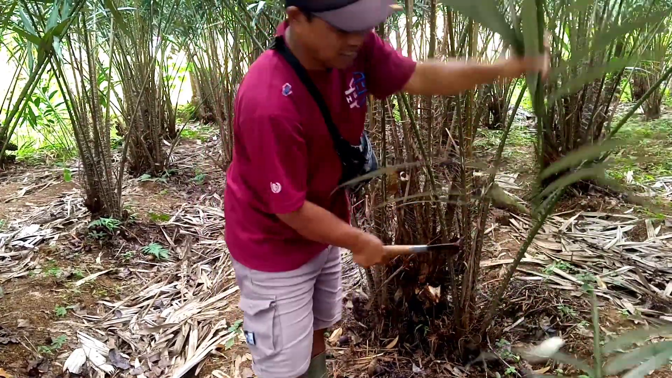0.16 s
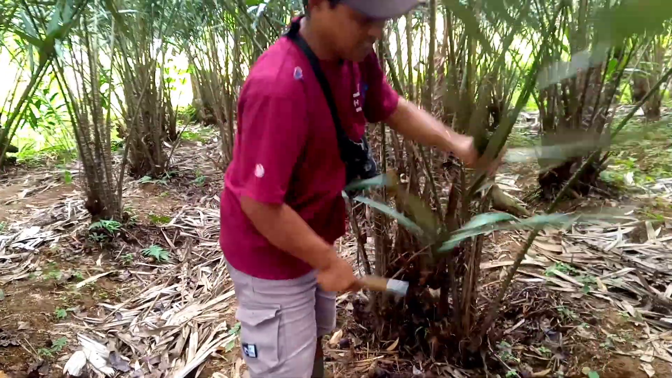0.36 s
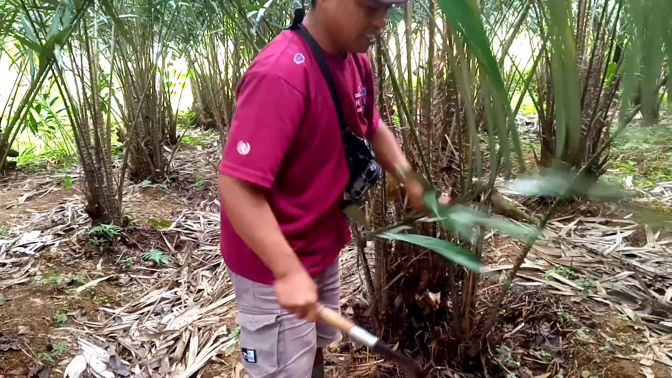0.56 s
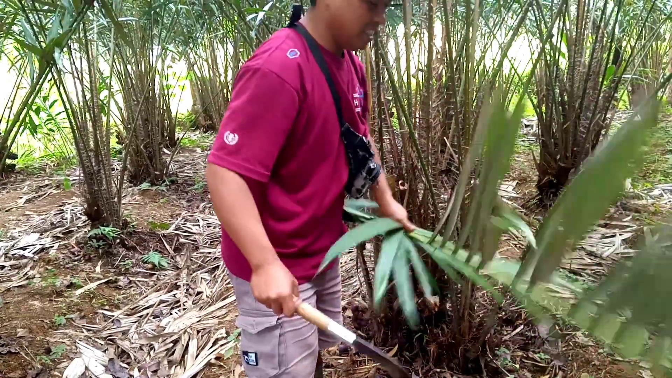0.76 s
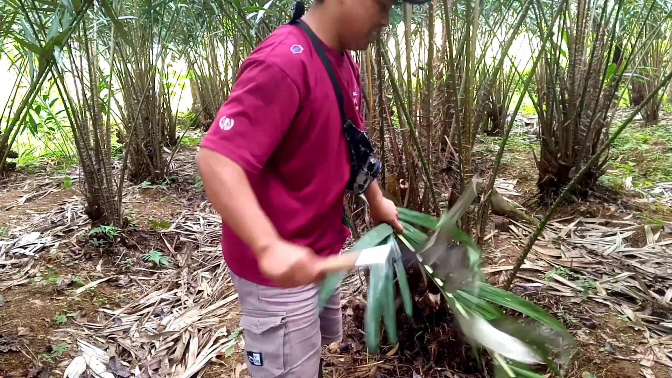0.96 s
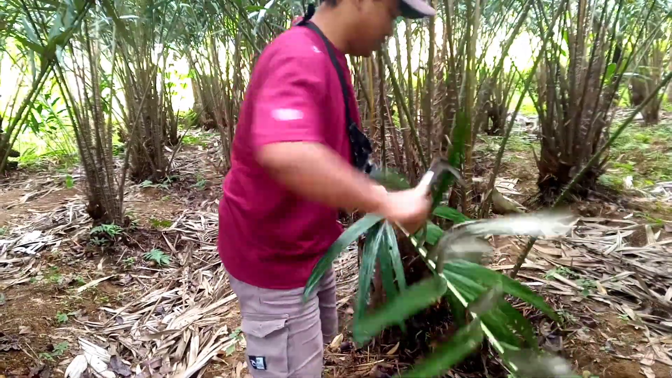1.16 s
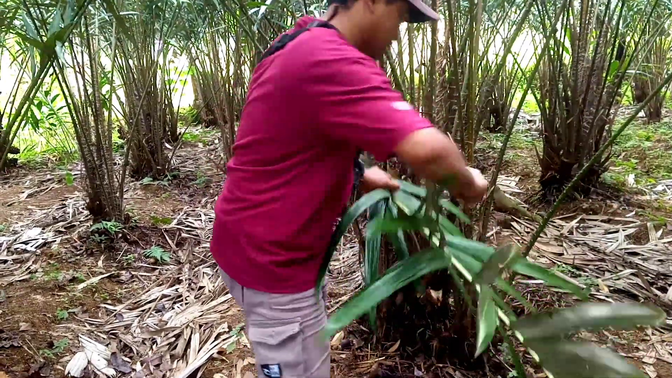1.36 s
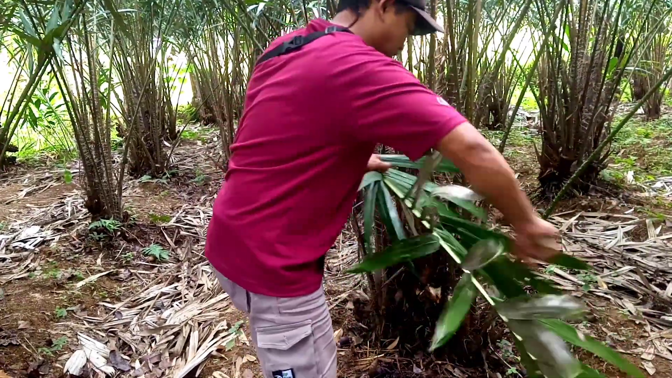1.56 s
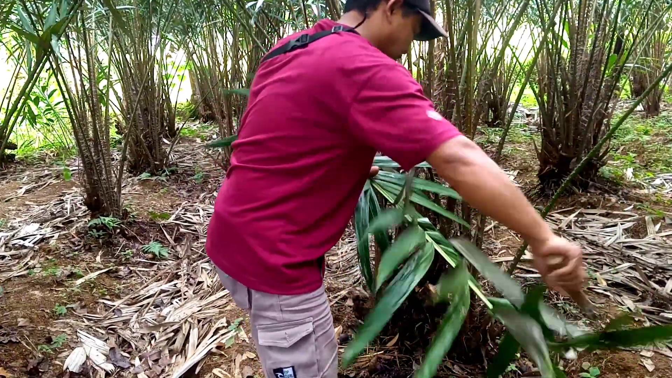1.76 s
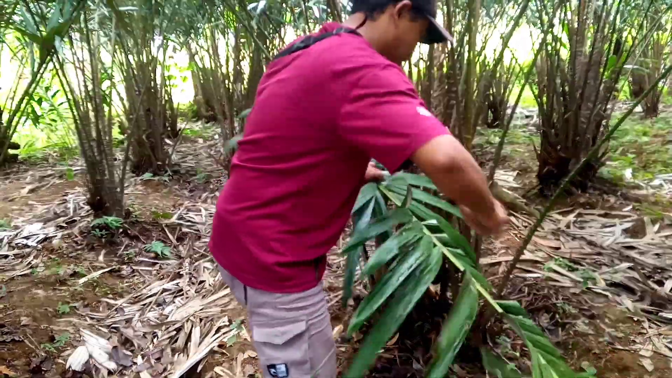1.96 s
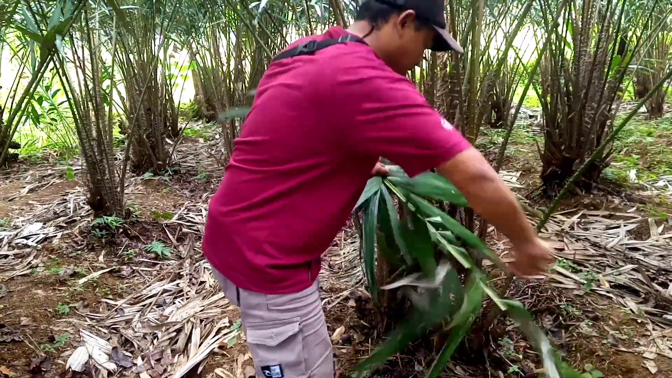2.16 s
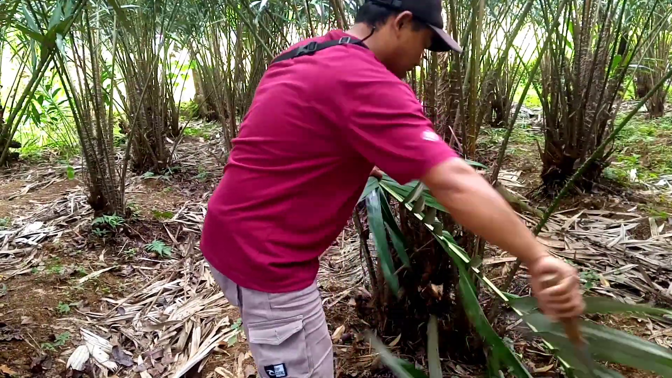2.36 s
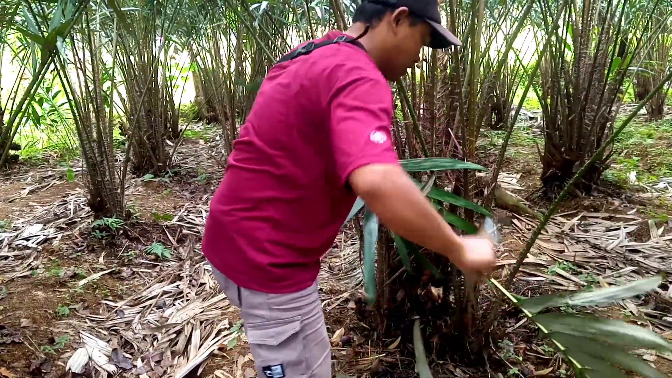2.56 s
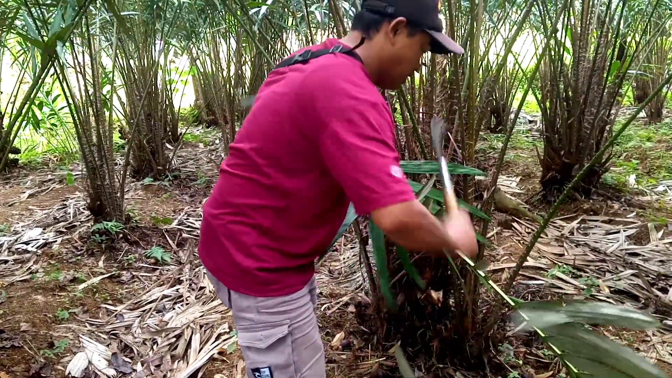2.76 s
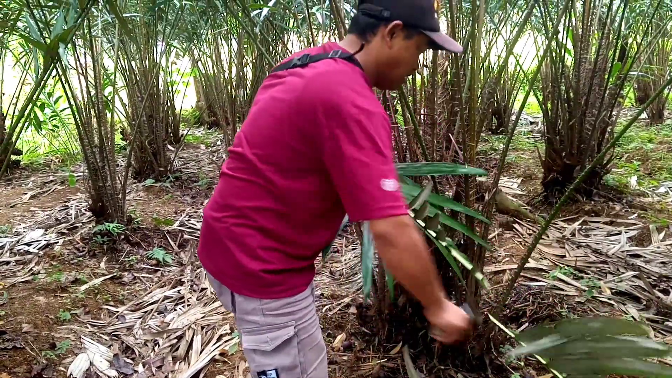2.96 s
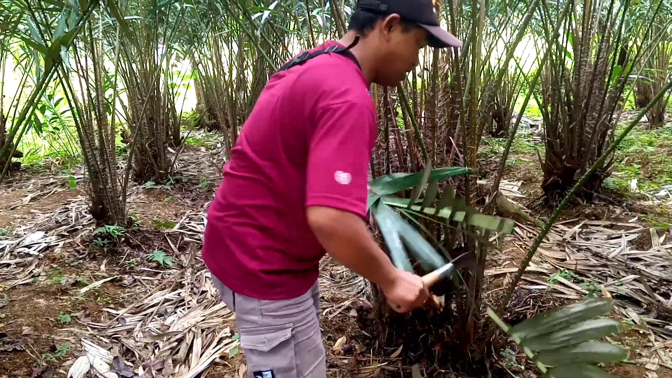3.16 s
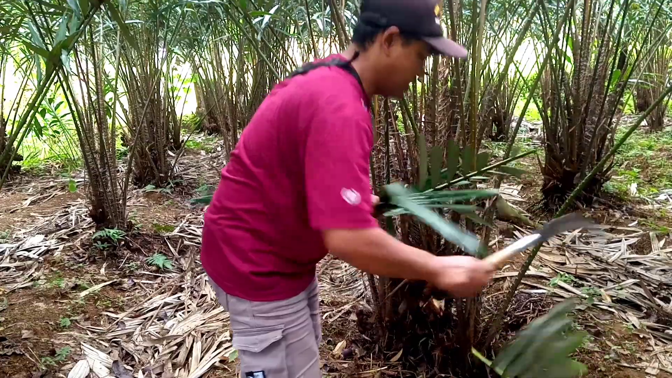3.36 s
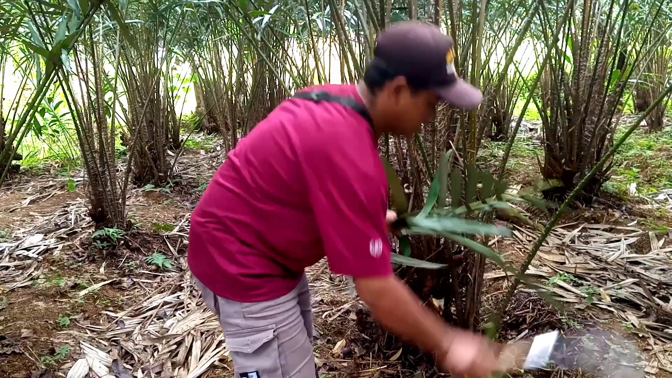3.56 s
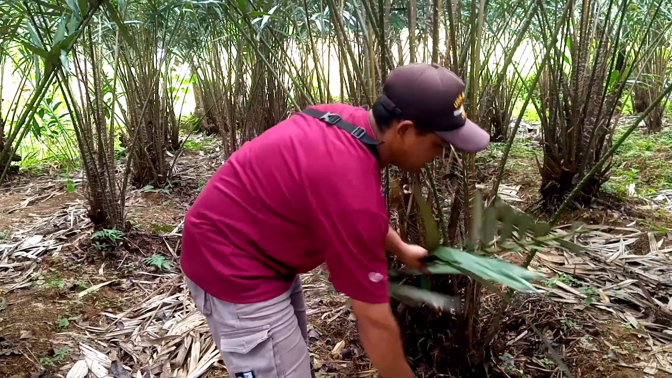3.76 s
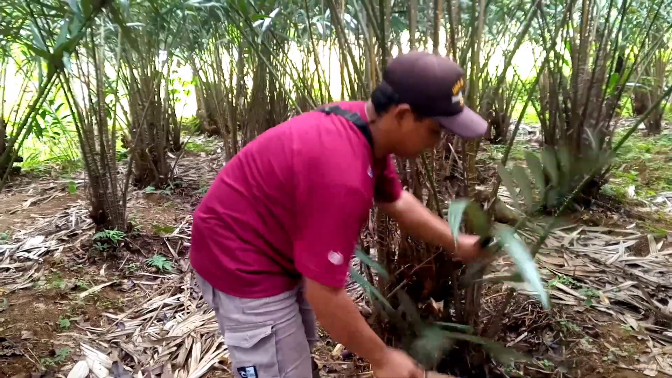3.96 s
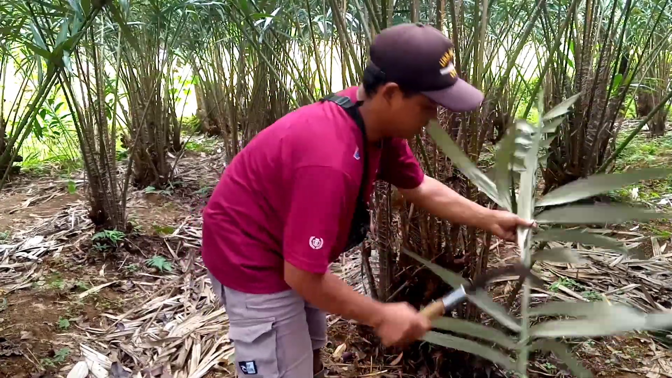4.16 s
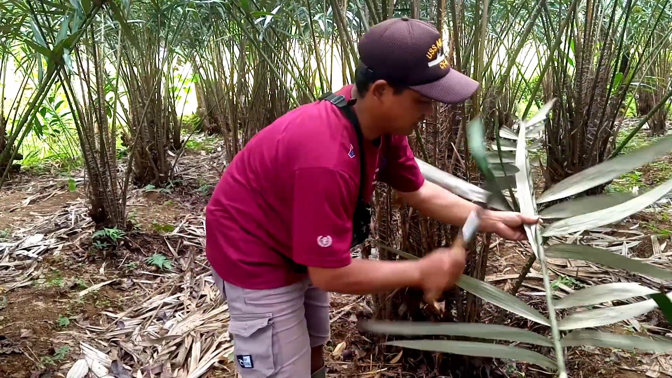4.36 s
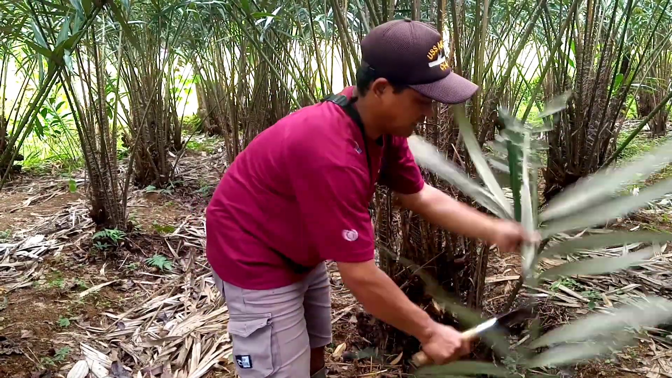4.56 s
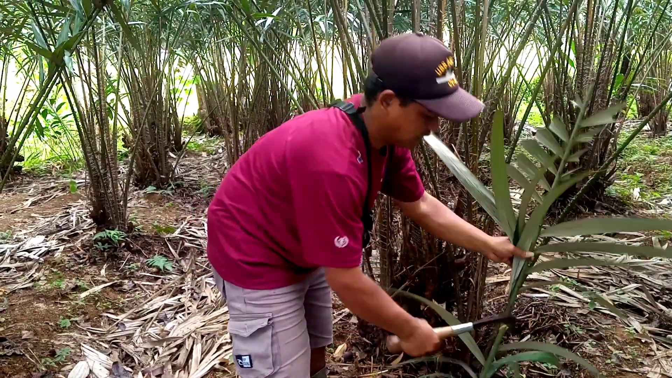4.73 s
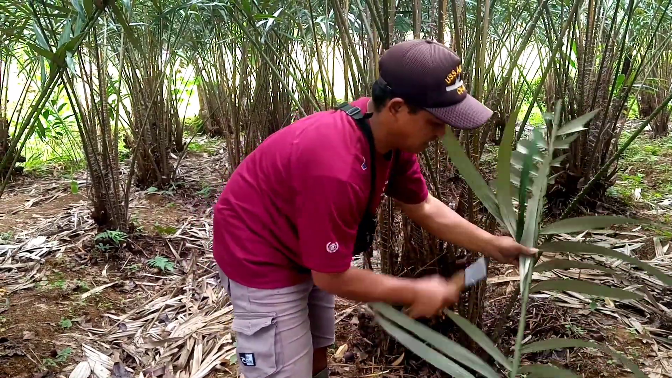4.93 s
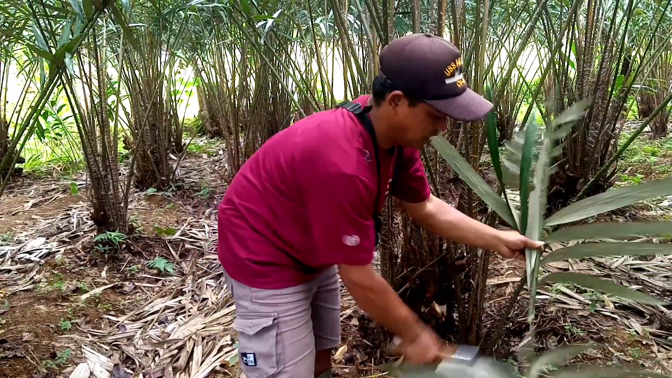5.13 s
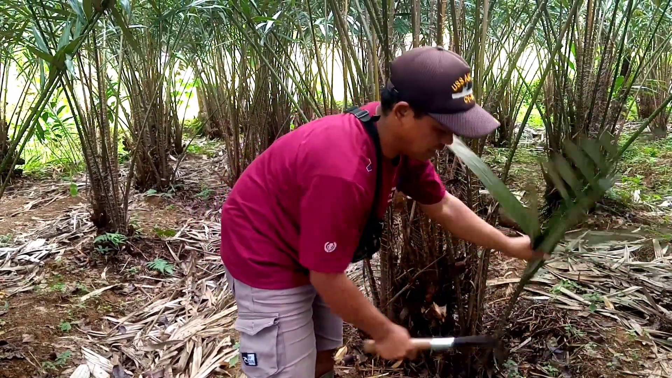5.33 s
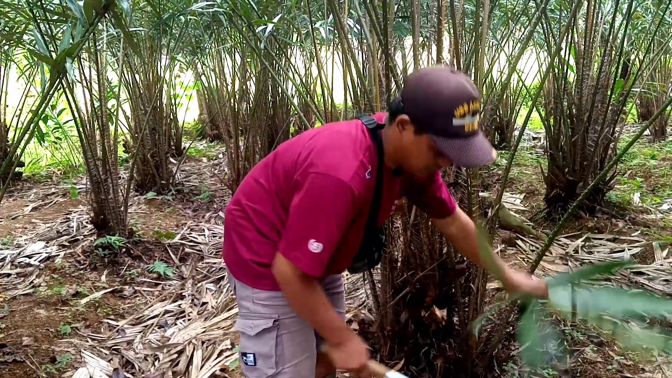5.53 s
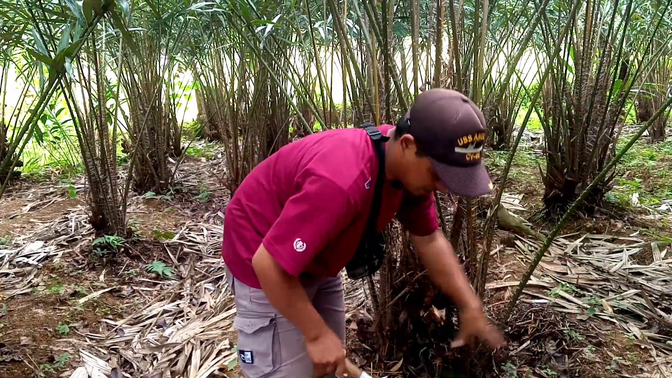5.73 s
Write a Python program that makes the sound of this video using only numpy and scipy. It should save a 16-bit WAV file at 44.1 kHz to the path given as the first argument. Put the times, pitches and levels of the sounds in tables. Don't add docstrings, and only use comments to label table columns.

```python
import sys
import numpy as np
from scipy import signal
from scipy.fft import rfft, irfft
from scipy.io import wavfile

SR = 44100
rng = np.random.default_rng(int(sys.argv[2]) if len(sys.argv) > 2 else 0)


def field_ratio(decibels):
    return 10 ** (np.asarray(decibels, dtype=float) / 20)


def generate_wav(sig):
    pcm = np.round(np.clip(np.atleast_2d(sig).T, -1, 1) * 32767).astype(np.int16)
    wavfile.write(sys.argv[1], SR, pcm)


N = 255339

# f/Hz, density/dB
FROND_COLOUR = [(200, -6.5), (400, -11.5), (650, -5.5), (1400, -5.5), (2800, -4), (4000, -4), (4700, -10.5),
                (5900, -8.5), (6700, -4.5), (7500, 0.5), (8500, -7.5), (10400, -16.5), (13000, -18.5),
                (15300, -12.5)]
BAND_EDGES_HZ = [200, 1200, 2500, 5000, 40000]
# peak t/s, 20 dB swell/s, 20 dB fade/s, rms level/dB, dryness/dB
DRAGS = [(.17, 1.1, .22, -41, 1.5), (.365, .17, .5, -36, 4), (.52, .3, .5, -30.5, .6),
         (.79, .2, .3, -38, -5), (.95, .4, .25, -31.5, 2), (1.07, .2, .12, -32, 4),
         (1.47, 1.2, .25, -40.5, 1.5), (1.93, .8, .8, -52, 1.5), (2.06, .15, .4, -43, -3),
         (2.26, .4, .35, -37.5, 1.1), (2.66, .9, .8, -50, -1), (3.0, .4, .8, -45, 3),
         (3.36, .9, .5, -46, 2), (3.64, .08, .3, -31, 3), (3.8, .25, .2, -32, -3), (3.91, .15, .17, -36, 3),
         (4.2, .3, .6, -59, -1), (4.56, .1, .3, -48, 6), (4.68, .3, .3, -48, -1),
         (5.072, .07, .04, -52, -12), (5.14, .1, .1, -54, -12), (5.275, .04, .2, -44, -1),
         (5.55, 1.1, .6, -57, 1), (5.79, .2, .2, -35, -1)]
DRAG_BANDS_DB = [-1.5, -.4, .4, .3]
DRYNESS_SHARE = [-.9, -.3, .3, .9]
# f/Hz, density/dB
MOTOR_COLOUR = [(18, -42), (30, -7), (48, -18), (112, 0), (141, -3), (167, -11.5), (206, -16), (260, -7.5),
                (340, -74), (570, -120)]
# t/s, level/dB
MOTOR_LOAD = [(0, -50), (.6, -48), (1.1, -53), (1.45, -48), (1.65, -59), (1.9, -53), (2.7, -55), (3.0, -52),
              (3.4, -53), (3.65, -47), (4.3, -51), (4.85, -55), (5.79, -51)]
# f/Hz, density/dB
AIR_COLOUR = [(200, 0.5), (330, 4.5), (700, -12), (2500, -16), (5000, -23), (9000, -20), (15400, -21)]
# t/s, peak level/dB, body rel/dB, hiss rel/dB, t60/s
CHOPS = [
    (.7272, -27.5, 9, -10, .057),
    (3.7346, -15, -6, -1, .06),
    (3.8449, -16.5, -30, -12, .026),
    (4.5147, -6, -8.5, -3.5, .051),
    (4.7473, -19, -14, -6, .05),
    (5.0895, -3.5, -26, -.4, .032),
]
# t/s, peak level/dB, hiss rel/dB, t60/s
RIBS = [(.171, -25, -11, .076), (.3466, -21, 1.5, .076), (.5357, -21, -12, .031), (.6512, -20.5, 4.5, .039),
        (.6824, -29, 8, .02), (.7198, -12.5, 2.5, .043), (.825, -13.5, -3.5, .047), (1.278, -25, -11, .044),
        (1.4077, -26, 2.1, .044), (1.5492, -10.5, 4, .04), (1.6084, -18.5, 12, .027),
        (1.6854, -33, 1.1, .05), (1.7311, -26.5, -12, .068), (1.9834, -34.5, -7, .056),
        (2.2837, -27, -11, .05), (2.6354, -35.5, .1, .065), (2.732, -38, -2, .05), (2.9857, -28.5, 7, .039),
        (3.1018, -37, -13, .039), (3.4544, -30.5, 5, .032), (3.9444, -34, 12, .05),
        (4.0764, -35.5, 4.5, .073), (4.4373, -42, -12, .05), (4.6973, -30.5, 4, .036),
        (4.9319, -39, 11, .02), (5.446, -32, -5, .05)]
# t/s, peak level/dB, hiss rel/dB, t60/s
SPINES = [(.267, -26.5, 2.1, .05), (.4285, -20, .1, .037), (1.76, -33, 2.1, .15), (1.919, -38.5, 4.5, .14),
          (2.0707, -36, 7, .045), (2.3835, -23, 2.5, .026), (2.969, -33, 4, .076), (3.046, -22, .1, .05),
          (3.5923, -25, 6, .04), (3.646, -19, 11, .021), (4.335, -40, 5, .064), (4.35, -34.5, 11.5, .035),
          (4.4016, -34.5, 4, .091), (4.8599, -32, -1, .059), (4.974, -40, -1, .05),
          (5.026, -39.5, 1.5, .05), (5.2234, -37, 11, .019), (5.2804, -22, 3.5, .041),
          (5.3953, -24, 3, .07), (5.608, -31.5, -1, .1), (5.6213, -29.5, 3.5, .084),
          (5.669, -23.5, .1, .073), (5.7824, -18, .1, .065)]
# t/s, peak level/dB, t60/s
FIBRES = [(.2712, -25, .061), (.6048, -16.5, .064), (1.33, -29, .055), (1.354, -22, .064),
          (2.6813, -43, .066), (3.0752, -23.5, .042), (3.1318, -29, .045), (3.1798, -27, .093),
          (3.3054, -34, .065), (3.5112, -32, .11), (3.5443, -29, .063), (3.6673, -16, .057),
          (3.7082, -17, .05), (3.8846, -20, .039), (4.0059, -19, .052), (4.366, -34, .11),
          (4.826, -48, .046), (5.193, -31, .041), (5.254, -27, .046), (5.286, -21, .028),
          (5.6433, -21.5, .044)]
# t/s, f/Hz, peak level/dB, t60/s
KNOCKS = [(0.54, 1700, -7.5, 0.014), (0.722, 1360, -19, .03), (.729, 835, -25, .04),
          (1.075, 3500, -16, 0.045), (1.356, 2870, -22, .015), (2.811, 2400, -28, 0.026),
          (2.834, 762, -18.5, 0.1), (2.833, 1227, -9.5, 0.067), (2.971, 1820, -26, 0.043),
          (3.015, 1100, -18.5, 0.023), (3.456, 2270, -19.5, 0.031), (4.177, 1430, -36, 0.036),
          (4.516, 1780, -12, .03), (4.517, 930, -16, 0.046), (4.748, 1100, -29, .03),
          (4.828, 750, -39, .03), (5.089, 920, -13, 0.08), (5.09, 1300, -12, .05),
          (5.0894, 640, -11, 0.086), (5.092, 2750, -13, 0.032), (.268, 7300, -18, .008),
          (.2725, 3300, -15, .01), (.347, 3300, -14, .012), (4.76, 600, -33, .08), (4.01, 700, -30, .08)]
# t/s, build-up/s, hold/s, rms level/dB, hiss rel/dB
TEARS = [(.465, .017, .069, -26.5, -2.5), (.714, .006, .01, -35, -9), (.829, .005, .031, -27, -3),
         (.856, .0073, .033, -23.5, -5.5), (.94, .0058, .03, -25, -4), (1.016, .013, .068, -28.5, .1),
         (1.104, .0038, .0083, -25, -6), (1.154, .0043, .02, -33, 1.5), (1.188, .0034, .037, -29, -2),
         (1.496, .0026, .059, -16, .6), (1.569, .0068, .018, -10.5, -5.5), (2.096, .022, .025, -18.5, 5.5),
         (2.156, .0078, .0039, -16.5, 2.5), (2.198, .0059, .022, -30, 4), (2.442, .0027, .029, -33.5, 4),
         (2.468, .0073, .011, -33.5, 10.5), (2.49, .0027, .016, -41, 11), (2.823, .007, .0082, -12.5, 1.1),
         (3.612, .0096, .052, -20.5, -1.5), (3.809, .0044, .06, -29.5, -2), (5.273, .0037, .065, -33, -1.5),
         (5.344, .011, .027, -33, -.6), (5.668, .0018, .018, -36.5, 5), (5.689, .0033, .052, -26, -3)]
# t/s, length/s, from f/Hz, to f/Hz, level/dB
BIRD_NOTES = [
    (4.14, .14, 735, 730, -60),
    (4.27, .19, 725, 735, -57),
    (4.21, .07, 2350, 2700, -59),
    (4.27, .09, 2600, 2850, -59),
]
GROVE_T60_S = [0.43, 0.15, 0.24, .2]

GROVE_DB, AIR_DB = -9.5, -61.5
RIB_BODY_DB, SPINE_BODY_DB, FIBRE_BODY_DB, FIBRE_HISS_DB = -21, -9, -7, -7
CHOP_RISE_S, SNAP_RISE_S, TEAR_T60_S = .0018, .00095, .023
TEAR_BODY_DB, BODY_LOSS_PER_HISS = -9, .3


def rms_one(x):
    return x / np.sqrt(np.mean(x ** 2) + 1e-20)


def causal(points, low_hz, high_hz, size=4096):
    hz = np.maximum(np.arange(size // 2 + 1) * SR / size, 5)
    point_hz, point_db = np.transpose(points)
    gain = field_ratio(np.interp(np.log(hz), np.log(point_hz), point_db))
    gain = gain / np.sqrt((1 + (low_hz / hz) ** 4) * (1 + (hz / high_hz) ** 4))
    cepstrum = irfft(np.log(gain + 1e-6))
    cepstrum[1:size // 2] *= 2
    cepstrum[size // 2 + 1:] = 0
    response = irfft(np.exp(rfft(cepstrum)))
    return response / np.sqrt(np.sum(response ** 2))


def drift(rate_hz):
    r = np.exp(-2 * np.pi * rate_hz / SR)
    settled = signal.lfilter([1], [1, -2 * r, r * r], rng.standard_normal(N + SR))[SR:]
    return rms_one(settled)


def crackle(per_s, spread_db, smooth):
    sizes = field_ratio(spread_db * np.minimum(rng.exponential(1, N), 5)) * rng.choice([-1, 1], N)
    clicks = rms_one(sizes * (rng.random(N) < per_s / SR))
    smooth = np.clip(smooth, 0, 1)
    return np.sqrt(1 - smooth) * clicks + np.sqrt(smooth) * rng.standard_normal(N)


def drags():
    t, power = np.arange(0, N + 64, 64) / SR, 0
    for peak_s, swell_s, fade_s, db, dry_db in DRAGS:
        shape_db = db - 20 * np.maximum((peak_s - t) / swell_s, (t - peak_s) / fade_s)
        bands_db = np.c_[DRAG_BANDS_DB] + dry_db * np.c_[DRYNESS_SHARE]
        power = power + field_ratio(shape_db + bands_db) ** 2
    return np.array([np.interp(np.arange(N) / SR, t, np.sqrt(band)) for band in power])


def leaf_ticks(per_s, cycles, count=14):
    clicks = crackle(per_s, spread_db=2.5, smooth=0)
    leaflet = rng.integers(0, count, N)
    out = 0
    for k, hz in enumerate(np.geomspace(800, 11000, count)):
        r = field_ratio(-60 * hz / (cycles * SR))
        poles = [1, -2 * r * np.cos(2 * np.pi * hz / SR), r * r]
        ring = signal.lfilter([1, 0, -1], poles, clicks * (leaflet == k) + 1e-18)
        out = out + rms_one(ring) * np.sqrt(hz)
    return rms_one(out)


def rustle():
    levels = drags() * field_ratio([1.45 * drift(36) for band in range(4)])
    clumps = field_ratio(1.9 * drift(30) + 0.5 * drift(130))
    slips = crackle(2500, spread_db=3.0, smooth=0.62) * clumps
    return levels * (slips + field_ratio(-7.5) * leaf_ticks(350, cycles=17.0))


def motor():
    turns = np.cumsum(22 * (1 + .12 * drift(3))) / SR
    throb = field_ratio(5.0 * np.cos(2 * np.pi * turns))
    thuds = signal.fftconvolve(throb * rng.standard_normal(N), causal(MOTOR_COLOUR, 23, 220))[:N]
    load_db = np.interp(np.arange(N) / SR, *np.transpose(MOTOR_LOAD))
    return field_ratio(load_db) * rms_one(thuds)


def air():
    return field_ratio(AIR_DB) * signal.fftconvolve(rng.standard_normal(N), causal(AIR_COLOUR, 150, 40000))[:N]


def bursts(rows):
    power, t = np.zeros((4, N)), np.arange(SR // 3) / SR
    for s, rise_s, held_s, t60_s, db, body_db, hiss_db in rows:
        start, rise_s = round(s * SR), max(rise_s, 2e-4)
        lasting_s = max(t60_s, .005) * np.array([[1.15], [1.05], [1.], [.9]])
        decay = field_ratio(-60 * np.maximum(t - rise_s - held_s, 0) / lasting_s)
        shape = np.minimum(t / rise_s, 1) * decay
        levels = field_ratio([[db + body_db], [db - 4.0], [db - 4.0], [db + hiss_db]])
        power[:, start:start + len(t)] += (shape * levels)[:, :N - start] ** 2
    return np.sqrt(power)


def snaps():
    breaks = [(*chop, CHOP_RISE_S) for chop in CHOPS]
    breaks += [(s, db, RIB_BODY_DB, hiss, t60, SNAP_RISE_S) for s, db, hiss, t60 in RIBS]
    breaks += [(s, db, SPINE_BODY_DB, hiss, t60, SNAP_RISE_S) for s, db, hiss, t60 in SPINES]
    breaks += [(s, db, FIBRE_BODY_DB, FIBRE_HISS_DB, t60, SNAP_RISE_S) for s, db, t60 in FIBRES]
    rows = [(s - 0.49 * rise_s, rise_s, 0, t60, db - 3.5, body, hiss)
            for s, db, body, hiss, t60, rise_s in breaks]
    spray = crackle(7000, spread_db=2.5, smooth=0.77) * field_ratio(0.65 * drift(200))
    cracks = [round((s + 1.4 * rise_s) * SR) for s, *_, rise_s in breaks]
    spray[cracks] = field_ratio(12.0) * np.sign(spray[cracks])
    return bursts(rows) * spray


def knocks():
    out, t = np.zeros(N), np.arange(SR // 8) / SR
    detunes = rng.uniform(-0.94, 1, (len(KNOCKS), 9, 1))
    for (s, hz, peak_db, t60_s), detune in zip(KNOCKS, detunes):
        modes = np.mean(np.sin(2 * np.pi * hz * np.exp(.2 * detune) * t), axis=0)
        ring = modes * np.minimum(t * hz / 1.5, 1)
        out[round(s * SR):][:len(t)] += field_ratio(peak_db + 4.0 - 60 * t / t60_s) * ring
    return out


def tears():
    rows = [(s, rise_s, held_s, TEAR_T60_S, db, TEAR_BODY_DB - BODY_LOSS_PER_HISS * hiss, hiss)
            for s, rise_s, held_s, db, hiss in TEARS]
    lumps = field_ratio([1.97 * drift(43) for band in range(4)])
    fibres = crackle(5000, spread_db=3.5, smooth=0.6) * field_ratio(2.0 * drift(210))
    return bursts(rows) * lumps * fibres


def birds():
    out = 0
    for s, long_s, from_hz, to_hz, db in BIRD_NOTES:
        along = np.clip((np.arange(N) / SR - s) / long_s, 0, 1)
        hz = (from_hz + (to_hz - from_hz) * along) * (1 + .02 * drift(60))
        level = field_ratio(db + 4.0 * drift(60)) * np.sqrt(np.sin(np.pi * along) + 1e-12)
        out = out + level * np.sin(2 * np.pi * np.cumsum(hz) / SR)
    return out


def grove(bands):
    out, late = bands.copy(), SR // 200
    for band, heard, t60_s in zip(bands, out, GROVE_T60_S):
        r = field_ratio(-120 / (t60_s * SR))
        power = signal.lfilter([1 - r], [1, -r], band ** 2 + 1e-18)
        heard[late:] += field_ratio(GROVE_DB) * np.sqrt(power[:-late]) * rng.standard_normal(N - late)
    return out


def scene():
    bands = grove(rustle() + snaps() + tears())
    fronds = sum(signal.fftconvolve(band, causal(FROND_COLOUR, low_hz, high_hz))[:N]
                 for band, low_hz, high_hz in zip(bands, BAND_EDGES_HZ, BAND_EDGES_HZ[1:]))
    thin = signal.butter(3, 170, "high", fs=SR, output="sos")
    return (signal.sosfilt(thin, fronds + knocks()) + motor() + birds() + air())[None]


def roll_off(x):
    return signal.sosfilt(signal.butter(12, 16800, fs=SR, output="sos"), x)


def record(dry):
    held = dry / (1 + np.abs(dry / .66) ** 4) ** .25
    held = signal.sosfilt(signal.butter(3, 55, "high", fs=SR, output="sos"), held)
    mix = signal.sosfilt(signal.ellip(12, .5, 60, 15480, fs=SR, output="sos"), held)
    return roll_off(mix)


dry = scene()
out = record(dry)
generate_wav(out)
```